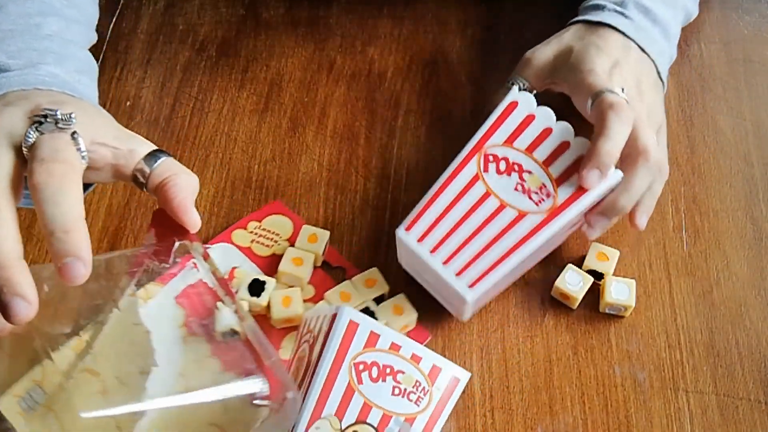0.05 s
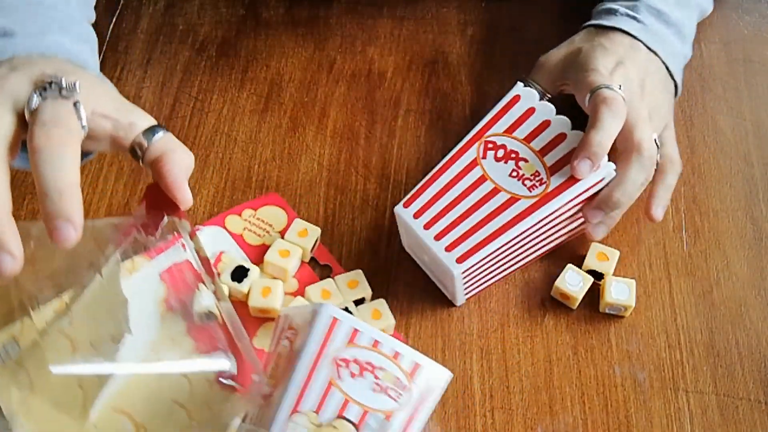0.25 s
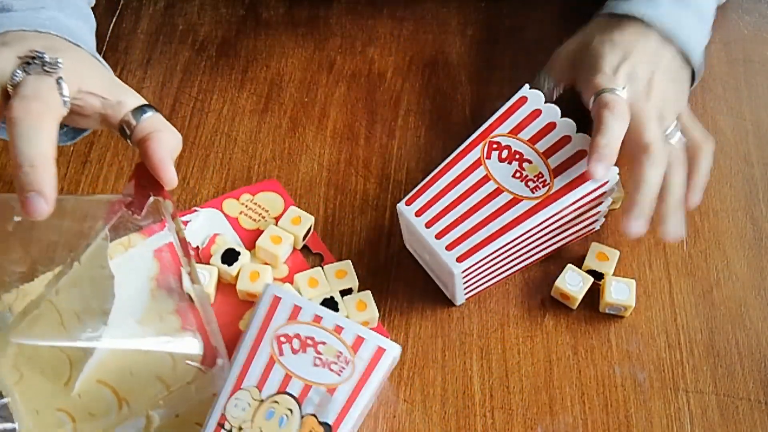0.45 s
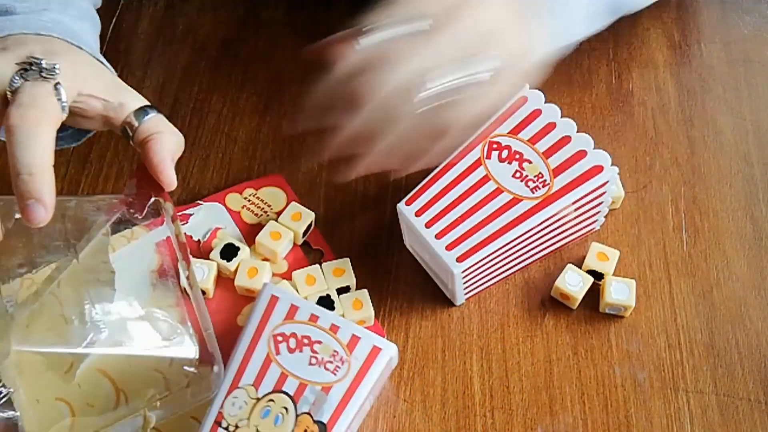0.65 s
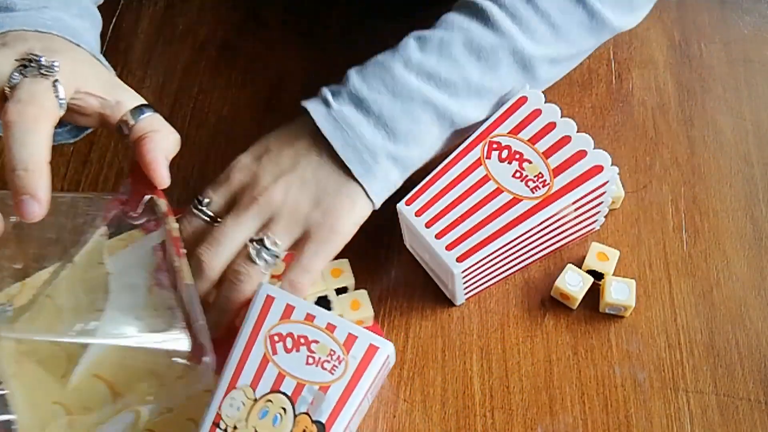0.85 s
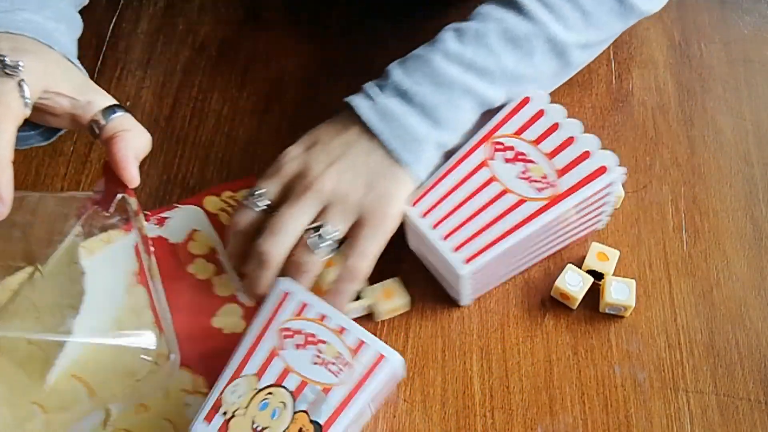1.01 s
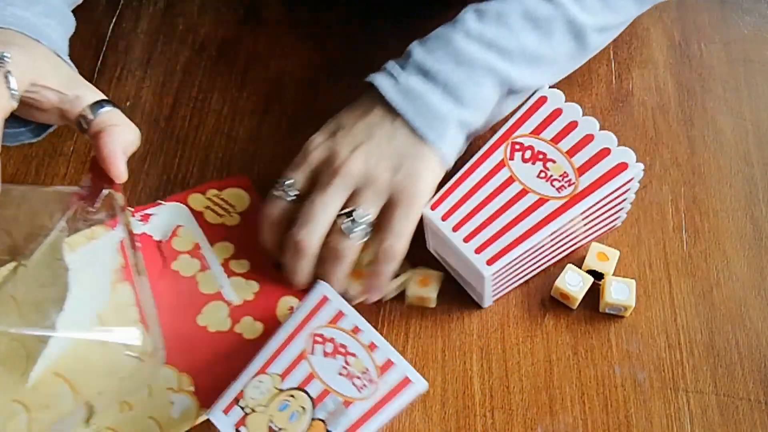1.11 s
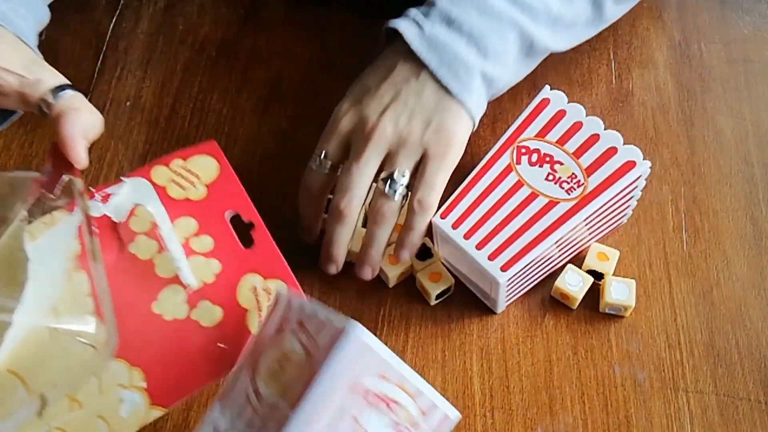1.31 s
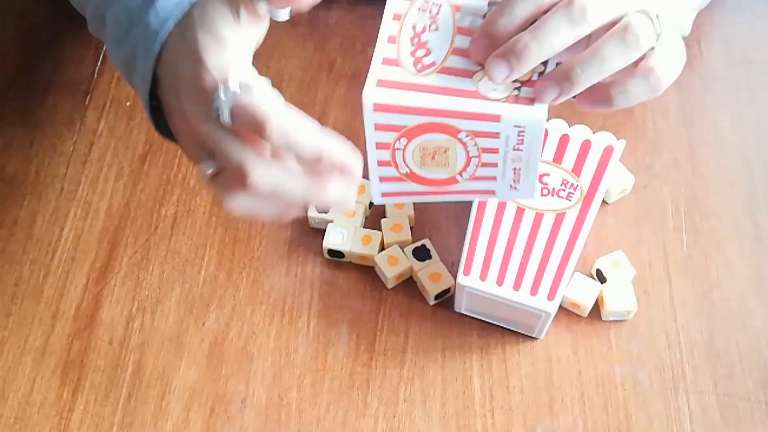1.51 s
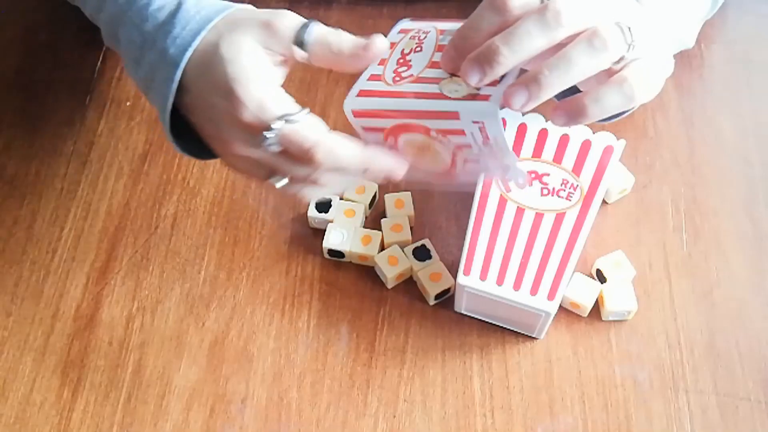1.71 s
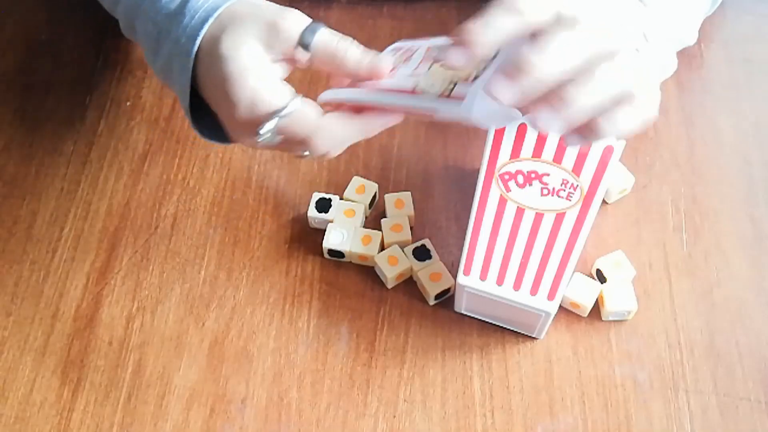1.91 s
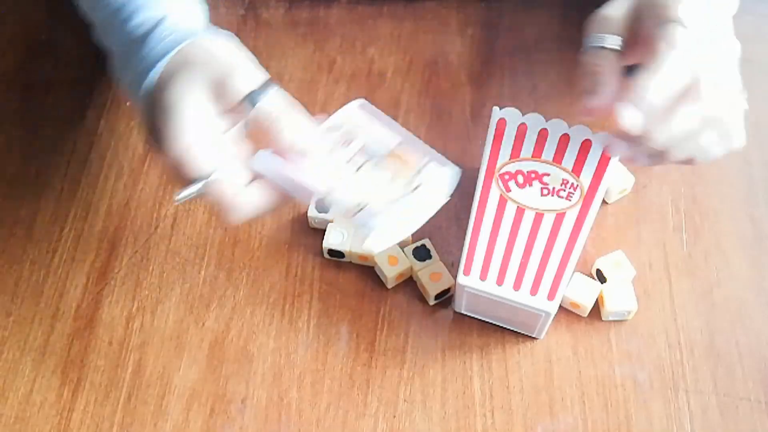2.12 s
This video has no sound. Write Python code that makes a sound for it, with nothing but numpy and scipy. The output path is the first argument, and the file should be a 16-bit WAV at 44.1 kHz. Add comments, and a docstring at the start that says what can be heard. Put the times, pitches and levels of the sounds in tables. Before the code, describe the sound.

A small plastic box thumps and clatters onto a wooden table, juddering to rest. Then a heap of dice is dragged over the wood, clacking together, and a light rustle follows. Close microphone in a small room.

```python
"""Fingers slip faintly on a small plastic box, then it thumps onto a wooden table, clatters on its
edges and judders to rest. A hand drags a heap of dice off a card and over the wood, the dice clacking
together, and a second box is picked up with a light rustle. Blows are short cracks that ring box or
table; sliding is a stream of tiny catches. Small room, close stereo microphone, table to its right;
the loudest blow overloads the recorder."""
import sys
import numpy as np
from scipy import signal
from scipy.fft import rfft, irfft, next_fast_len
from scipy.io import wavfile
from scipy.ndimage import uniform_filter1d

SR = 44100
rng = np.random.default_rng(int(sys.argv[2]) if len(sys.argv) > 2 else 0)


def pcm_store(signal):
    """Save signal as 16-bit PCM."""
    levels = np.round(np.clip(np.atleast_2d(signal), -1, 1) * 32767)
    wavfile.write(sys.argv[1], SR, levels.astype(np.int16).T)


N = 94815


def amp(db):
    """Decibels to gain."""
    return 10 ** (np.asarray(db) / 20)


def unit(x):
    """Scales to rms 1."""
    return x / np.sqrt(np.mean(x ** 2) + 1e-20)


def at_hz(points, hz):
    """Reads a curve on a log-frequency axis."""
    f, value = np.transpose(points)
    return np.interp(np.log(hz + 1), np.log(f), value)


def level(curve, column=1):
    """Gain over time from one dB column of a curve, silent outside it."""
    rows = np.array(curve)
    return amp(np.interp(np.arange(N) / SR, rows[:, 0], rows[:, column], left=-120, right=-120))


def colour(x, *spectra, size=4096):
    """Causal filter with the sum of the given dB spectra."""
    hz = abs(np.fft.fftfreq(size, 1 / SR))
    log_gain = np.log(amp(sum(at_hz(s, hz) for s in spectra)))
    impulse = np.fft.ifft(np.exp(np.conj(signal.hilbert(log_gain)))).real[:size // 2]
    return signal.fftconvolve(x, impulse[None], axes=1)[:, :x.shape[1]]


def diffuse_noise(size, alike_hz=420):
    """Noise at the two capsules: shared in the bass, unrelated above."""
    left, other = rfft(rng.standard_normal((2, size)))
    shared = 1 / (1 + (np.fft.rfftfreq(size, 1 / SR) / alike_hz) ** 2)
    return irfft(np.array([left, shared * left + np.sqrt(1 - shared ** 2) * other]), size)


# The quiet room at the microphone: air spectrum and hum lines (f/Hz, level/dB)
AIR_COLOUR = [(15, -34.5), (25, -4.5), (49, -12), (102, -3), (285, -8), (575, -17), (1370, -16),
              (1890, -18), (2280, -18), (2480, -25.5), (2690, -19), (3720, -19.5), (16000, -30)]
HUM_LINES = [(118.4, -64), (193.8, -72.5), (269.2, -64), (349.9, -76.5)]
def room_tone(air_db=-56.5):
    """Faint air noise and a low hum."""
    t = np.arange(N) / SR
    hum = sum(amp(db) * np.sqrt(2) * np.sin(2 * np.pi * (hz * t + rng.random())) for hz, db in HUM_LINES)
    return amp(air_db) * unit(colour(diffuse_noise(N, alike_hz=700), AIR_COLOUR)) + hum


# Decay of the small room (f/Hz, t60/s)
ROOM_DECAY = [(60, 0.82), (250, 0.22), (600, 0.39), (1500, 0.23), (4000, 0.25), (8000, 0.23), (16000, 0.27)]
# Its furnishings soak up the treble (f/Hz, level/dB)
ROOM_COLOUR = [(200, -1.5), (1000, -1), (3500, 2), (7000, -4), (11000, -5.5)]
def contact(crack_s, room_db, size=16384, build_s=.005):
    """One contact heard close: a short crack, then the room's duller tail."""
    t = np.arange(size) / SR
    crack = rng.standard_normal(size) * (t / crack_s) ** 0.48 * np.exp(-t / crack_s)
    for _ in range(3):  # even out the spectrum, keeping the crack short
        crack = irfft(np.exp(1j * np.angle(rfft(crack)))) * np.exp(-(t / (3 * crack_s)) ** 2)
    hz, frame_s, bands = signal.stft(diffuse_noise(size), SR, nperseg=256)
    decay = amp(-60 * frame_s / at_hz(ROOM_DECAY, hz)[:, None])
    tail = signal.istft(bands * decay, SR)[1][:, :size]
    tail = colour(unit(tail * (1 - np.exp(-t / build_s))), ROOM_COLOUR, size=512)
    return (unit(crack) + amp(room_db) * tail) / np.sqrt(size * (1 + amp(room_db) ** 2))


def friction(spectrum, per_s, spread_db, room_db, body=0):
    """Steady stream of tiny catches of uneven size, ringing the room and any body given."""
    chance, size, sign = rng.random((3, N))
    catches = (chance < per_s / SR) * amp(-spread_db * np.log(size + 0.019)) * np.sign(sign - .5)
    rubbing = signal.fftconvolve(catches[None], contact(0.0018, room_db) + body, axes=1)[:, :N]
    return unit(colour(rubbing, spectrum))


# Box in the hand, above the table: envelope (t/s, level/dB) and spectrum (f/Hz, level/dB)
SLIP_LEVEL = [(0, -62), (.04, -50.5), (.09, -51.5), (.14, -47.5), (.19, -52.5), (.23, -64.5)]
SLIP_COLOUR = [(100, -11.5), (550, -7.5), (900, -1), (1700, 2), (2200, -7), (3200, -4), (5000, -13),
               (8000, -29), (16000, -42)]
def finger_slip():
    """Plastic rubs lightly on the fingers before the box is set down."""
    return level(SLIP_LEVEL) * friction(SLIP_COLOUR, per_s=3300, spread_db=-12.5, room_db=-4)


# Fingers and dice on plastic and wood, close by (t/s, f/Hz, level/dB)
TAPS = [(0.143, 1040, -24.5), (0.145, 785, -28), (0.934, 1440, -25.5), (1.1165, 1216, -15.5),
        (1.1245, 900, -25), (1.2208, 1870, -8.5), (1.47, 3340, -28.5), (1.477, 1460, -34.5),
        (1.483, 1170, -35), (1.494, 1360, -29.5), (1.479, 78.6, -42.5)]
def hollow_taps(room_db=-4, fall_cycles=8, longest_fall_s=0.041):
    """Soft contacts ring one hollow note, which falls 20 dB in a few cycles."""
    out = np.zeros((2, N))
    for start, hz, db in TAPS:
        cycles = np.arange(8192) * hz / SR
        envelope = (1 - np.exp(-cycles)) * amp(-20 * cycles / min(fall_cycles, longest_fall_s * hz))
        note = amp(db) * envelope * np.sin(2 * np.pi * cycles)
        add(out, start, np.array([note, note]))
    return out + amp(room_db) * signal.fftconvolve(out, contact(0.0023, room_db=4.7), axes=1)[:, :N]


def add(mix, start_s, sound):
    """Mixes in a stereo sound."""
    part = mix[:, round(start_s * SR):][:, :sound.shape[1]]
    part += sound[:, :part.shape[1]]


def ringing(modes, t60, size=16384):
    """Well damped modes, each reaching the two capsules at its own phase."""
    t = np.arange(size) / SR
    tones = sum(amp(db) * np.sin(2 * np.pi * (hz * t + rng.random() + rng.random((2, 1)) / 4))
                for hz, db in modes)
    return np.exp(-np.log(1000) * t / t60) * tones


# Centres of a blow's thud, knock, click and tick (f/Hz)
BLOW_BANDS = [250, 1500, 4300, 9000]
def blows(hits, spectrum, modes, t60, ring_db, note_q=15, spot_db=4.5, spot_octaves=0.13):
    """Each blow cracks, rings the modes and sounds the short note of the spot that is struck."""
    out = np.zeros((2, N))
    for start, *band_db, room_db, hz, note_db, crack_s in hits:
        blow = contact(crack_s, room_db) + amp(ring_db) * ringing(modes, t60)
        note = amp(note_db) * signal.lfilter(*signal.iirpeak(hz, note_q, fs=SR), blow)
        spot = [(hz / 2 ** spot_octaves, 0), (hz, spot_db), (hz * 2 ** spot_octaves, 0)]
        balance = list(zip(BLOW_BANDS, band_db))
        add(out, start, colour(blow + note, spectrum, balance, spot))
    return out


# Box landing close to the microphone
# (t/s, thud/dB, knock/dB, click/dB, tick/dB, room/dB, f/Hz, note/dB, crack/s)
BOX_HITS = [(.2332, 25.5, 16.5, -11.5, -17.5, -1, 800, -3.5, 0.0023),
            (.2558, 25.5, 28, 10, 20, 1, 2200, -9.5, .0028),
            (.2795, 18.5, 23.5, 7, 7.5, 4.5, 1900, -14, .0025),
            (.2980, 23, 19.5, 10.5, 6.5, -4, 2745, 1.5, 0.0011),
            (.3158, 13, 23.5, 19.5, 16.5, -6, 2720, -4, .0035),
            (.3474, 23.5, 29, 32, 38.5, 0.5, 3680, -13, 0.0043),
            (.3685, 6.5, 16, 16.5, 11.5, 5.5, 3220, -6, 0.0064),
            (.3838, 1.5, 14.5, 22.5, 23.5, -10.5, 3000, 1.5, 0.0029),
            (.404, 9, 16, 11.5, 6, -1.5, 2320, -3, 0.0029)]
# Spectrum of its blows and its modes on the table (f/Hz, level/dB)
BOX_COLOUR = [(25, -30.5), (50, -20), (85, -2), (250, -1), (400, -3.5), (640, -5), (1150, -1.5), (2600, -1),
              (4400, -4.5), (4900, -1), (5500, -7), (6100, -17), (6900, -15), (7700, -26), (12000, -43),
              (16000, -40.5)]
BOX_MODES = [(221, -43), (770, -35.5), (1124, -33.5), (1288, -35), (1593, -36), (1624, -40.5),
             (1842, -36.5), (1976, -41.5), (2283, -36.5), (2341, -34), (2745, -42.5), (2978, -35.5),
             (3214, -36.5), (3696, -42), (3838, -44)]
def box_clatter():
    """The plastic box thumps on the wood and clatters from edge to edge."""
    return blows(BOX_HITS, BOX_COLOUR, BOX_MODES, t60=0.21, ring_db=-11)


# Box settling where it landed: envelope (t/s, level/dB) and spectrum (f/Hz, level/dB)
JUDDER_LEVEL = [(.497, -66), (.504, -35), (.55, -37.5), (.61, -41.5), (.67, -53.5), (.72, -68), (.77, -58)]
JUDDER_COLOUR = [(30, -26), (75, -3), (140, -10.5), (240, 5), (310, -7.5), (370, -0.5), (480, 0.5),
                 (650, -15.5), (880, -7.5), (1100, -19.5), (1550, -14.5), (2500, -25.5), (6000, -46.5)]
def box_judder(per_s=100):
    """A quick, uneven run of soft bumps as the box comes to rest."""
    wander, size = rng.standard_normal((2, N))
    rate = per_s * np.exp(.35 * unit(uniform_filter1d(wander, 400)))
    bumps = np.diff(np.floor(np.cumsum(rate) / SR), prepend=0) * amp(3 * size)
    judder = signal.fftconvolve(bumps[None], contact(0.0017, room_db=-2), axes=1)[:, :N]
    return level(JUDDER_LEVEL) * unit(colour(judder, JUDDER_COLOUR))


# Dice and plastic clacking on the same table
# (t/s, thud/dB, knock/dB, click/dB, tick/dB, room/dB, f/Hz, note/dB, crack/s)
DICE_HITS = [(.657, 10, -13, -21, -23.5, -2.5, 2340, -12, 0.0038),
             (.934, -13, -11, 6.5, 11.5, 6.5, 4700, -0.5, 0.0016),
             (.950, -15, -15, 10, 4, 4.5, 4000, 0, 0.0019), (.965, 10, -23, -4, 13, -13, 5300, 0, 0.002),
             (.9735, 19, 15.5, 8, 21.5, 4, 4850, 4, 0.0073), (1.006, 19, 10, 10, 2, 0, 1550, 7.5, .005),
             (1.027, 12.5, -3, -3, 5, -7, 3940, 6, .003),
             (1.0475, 12.5, 16.5, 12.5, -7, 2, 2560, -10, 0.0033),
             (1.0615, 18, 16, 8.5, 1, -2.5, 2550, -5, .005),
             (1.099, 24.5, 22, 15.5, -3, 0.5, 2850, -2, 0.0031),
             (1.116, 19, 16, 9, 3, -2.5, 1226, -6, 0.0063), (1.124, 23.5, 15, 3, -5, 0.5, 876, 6, 0.0036),
             (1.155, 9, 20, 12, -12, 7, 1720, -13, 0.0027),
             (1.195, -6, 22.5, 16.5, 13.5, 1.5, 2830, -8, 0.0027),
             (1.208, 17, 15, 11, -2, 21, 2880, -7, .003),
             (1.2205, 11, 16.5, 16.5, -17, -2, 1830, 0, 0.0024),
             (1.246, 8, 11, 17.5, -2, -5, 2470, -4, 0.0018),
             (1.284, 15.5, 12, 11, -2, -2.5, 3440, -3.5, 0.0047),
             (1.4705, 9, -7, -21, -17, 0.5, 3400, -20, 0.00146),
             (1.732, -4, -17, -18.5, -15, -7, 1497, 1.5, 0.0024),
             (1.9445, -2.5, -22.5, -15, 5, 2, 4870, 6, 0.0039)]
# Spectrum of their blows and modes of the wood beneath (f/Hz, level/dB)
DICE_COLOUR = [(25, -12), (50, -10), (85, -21.5), (220, -3.5), (400, -11.5), (620, -4), (1150, -1.5),
               (2600, 0), (4900, -2.5), (6500, -6.5), (8500, -24), (12000, -48.5), (16000, -46.5)]
TABLE_MODES = [(141.5, -38.5), (780, -33.5), (900, -35.5), (1120, -50.5), (1217, -37.5), (1400, -39.5),
               (1640, -38), (1880, -39), (2195, -35), (2415, -36), (2750, -43.5), (3580, -34.5)]
TABLE_T60_S = 0.16
def dice_clacks():
    """Dice strike the wood and each other, ringing the table top."""
    return blows(DICE_HITS, DICE_COLOUR, TABLE_MODES, TABLE_T60_S, ring_db=-11.5)


# The heap sliding, heard close (t/s, rumble/dB, scrape/dB, hiss/dB)
DRAG_LEVELS = [(.88, -76.5, -63.5, -72.5), (.93, -51, -51, -59), (.975, -48.5, -33, -36),
               (1.04, -39.5, -29, -33.5), (1.09, -30, -27, -35), (1.128, -25.5, -20, -35),
               (1.18, -29, -27, -40.5), (1.22, -28, -23, -44), (1.27, -36.5, -26.5, -42.5),
               (1.31, -36, -43, -45.5), (1.35, -50.5, -62, -56), (1.42, -69, -53, -56),
               (1.46, -81, -75, -68)]
# Spectra of those three layers (f/Hz, level/dB)
RUMBLE_COLOUR = [(25, -31), (50, -43), (75, 2), (140, 3.5), (260, 2), (370, 2), (560, -1), (900, -8.5),
                 (2500, -54.5)]
SCRAPE_COLOUR = [(150, -39), (500, -6.5), (850, 1), (1250, 6), (2000, 4.5), (3200, 0.5), (4800, -25.5),
                 (7000, -38.5), (16000, -58)]
HISS_COLOUR = [(800, -27.5), (2800, 1), (4800, -2), (6200, -9), (8000, -6.5), (10500, -20), (16000, -28.5)]
def dice_drag():
    """Sliding dice rumble the table top, scrape on the grain and hiss over the card."""
    wood = amp(-14) * ringing(TABLE_MODES, TABLE_T60_S)
    rumble = level(DRAG_LEVELS, 1) * friction(RUMBLE_COLOUR, per_s=1200, spread_db=2.5, room_db=-1)
    scrape = level(DRAG_LEVELS, 2) * friction(SCRAPE_COLOUR, per_s=600, spread_db=3, room_db=0, body=wood)
    hiss = level(DRAG_LEVELS, 3) * friction(HISS_COLOUR, per_s=1900, spread_db=-0.5, room_db=2)
    return rumble + scrape + hiss


# Second box lifted near the microphone (t/s, level/dB)
RUSTLE_LEVEL = [(1.86, -88.5), (1.91, -58), (1.945, -55), (1.98, -56.5), (2.025, -50.5), (2.045, -41.5),
                (2.062, -44), (2.08, -53), (2.15, -89.5)]
# Spectrum of the rubbing and modes of the walls (f/Hz, level/dB)
RUSTLE_COLOUR = [(200, -35.5), (1600, -8.5), (2100, -0.5), (3000, -2), (4900, -1), (6500, -10.5),
                 (10000, -20), (16000, -30)]
WALL_MODES = [(2170, -19), (3720, -19.5), (4900, -23), (6430, -28), (7830, -22)]
def box_rustle():
    """Fingers rub on the second box and its thin walls ring."""
    walls = amp(-14) * ringing(WALL_MODES, t60=.025)
    rubbing = friction(RUSTLE_COLOUR, per_s=10000, spread_db=5, room_db=-10, body=walls)
    return level(RUSTLE_LEVEL) * rubbing


# Right capsule against left: lead (f/Hz, phase/rad) and balance (f/Hz, level/dB)
RIGHT_LEAD = [(100, .05), (300, 0.19), (600, 2.44), (1200, 1.076), (2500, 1.35), (5000, 1.6), (12000, 1.3)]
RIGHT_BALANCE = [(200, 0), (350, -1), (700, 2), (1400, -0.5), (2800, 5.5), (5000, 2), (10000, -3.5)]
def microphone(x):
    """The table lies to the right: that side hears it sooner and, on the whole, louder."""
    size = next_fast_len(N + 4096)
    hz = np.fft.rfftfreq(size, 1 / SR)
    side = np.array([[-.5], [.5]])
    gain = amp(side * at_hz(RIGHT_BALANCE, hz))
    lead = np.exp(1j * side * at_hz(RIGHT_LEAD, hz))
    return irfft(rfft(x, size) * gain * lead, size)[:, :N]


def scene():
    """Boxes, dice and hands at the close microphone, over the room tone."""
    contacts = box_clatter() + dice_clacks() + hollow_taps() + box_judder()
    rubbing = finger_slip() + dice_drag() + box_rustle()
    return microphone(contacts + rubbing) + room_tone()


def record(dry, limit_db=-10.5, attack_s=0.0077, release_db_per_s=343, ceiling=0.79, knee=15):
    """Low cut, limiter, soft clip, high cut: the loudest blow overloads before the limiter ducks."""
    dry = signal.sosfilt(signal.butter(2, 35, "high", fs=SR, output="sos"), dry)
    pole = np.exp(-1 / (attack_s * SR))
    smoothing = [1 - pole], [1, -pole]
    power_db = 10 * np.log10(signal.lfilter(*smoothing, (dry ** 2).mean(0)) + 1e-12)
    fall_db = np.arange(N) * release_db_per_s / SR
    held_db = np.maximum.accumulate(power_db + fall_db) - fall_db
    over_db = np.maximum(held_db - limit_db, 0)
    ducked = dry / amp(signal.lfilter(*smoothing, over_db))
    clipped = ducked / (1 + abs(ducked / ceiling) ** knee) ** (1 / knee)
    high_cut = signal.firwin(511, 16200, window=("kaiser", 9), fs=SR)
    return signal.oaconvolve(clipped, high_cut[None], "same")


dry = scene()
out = record(dry)
pcm_store(out)
```